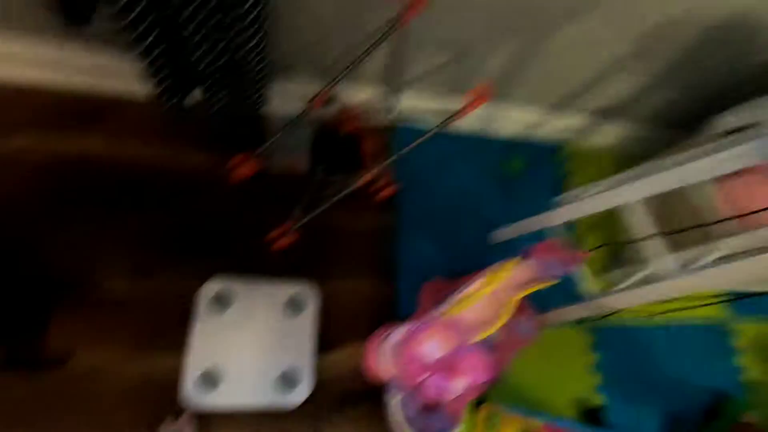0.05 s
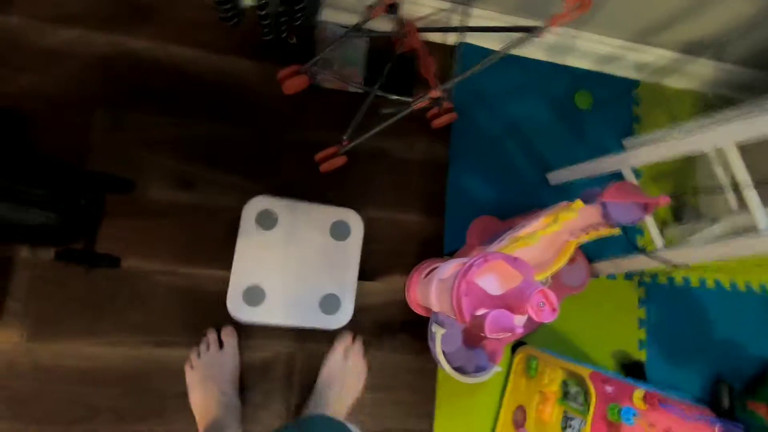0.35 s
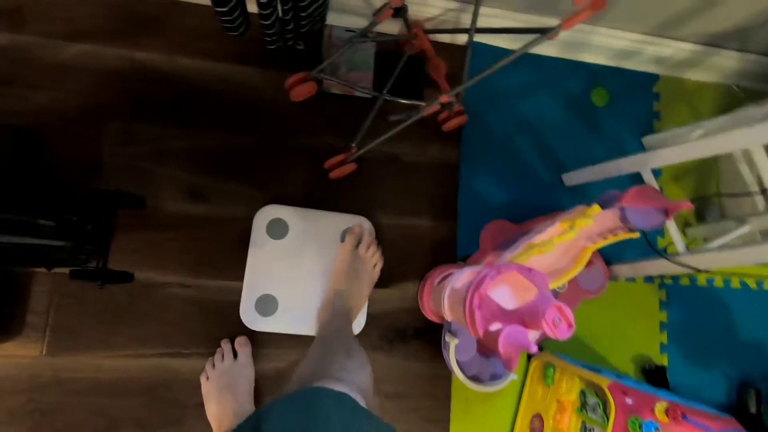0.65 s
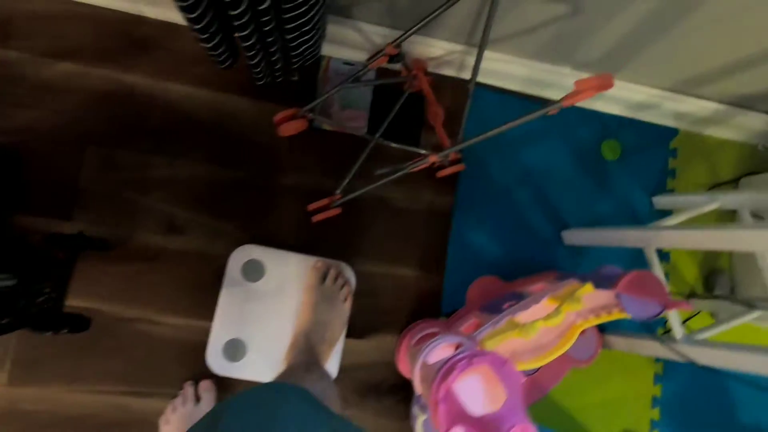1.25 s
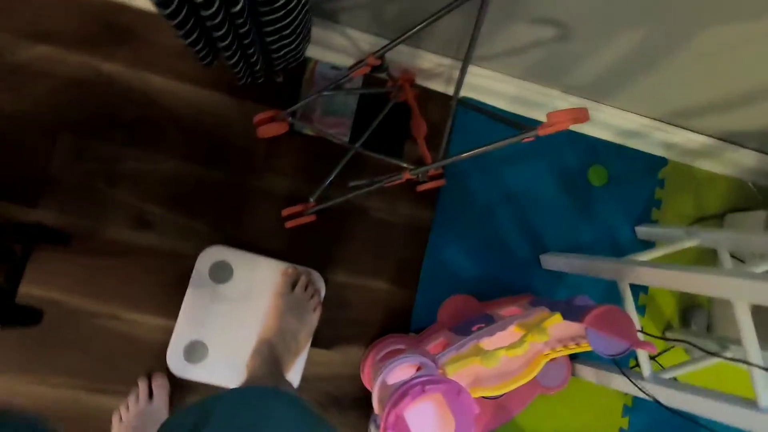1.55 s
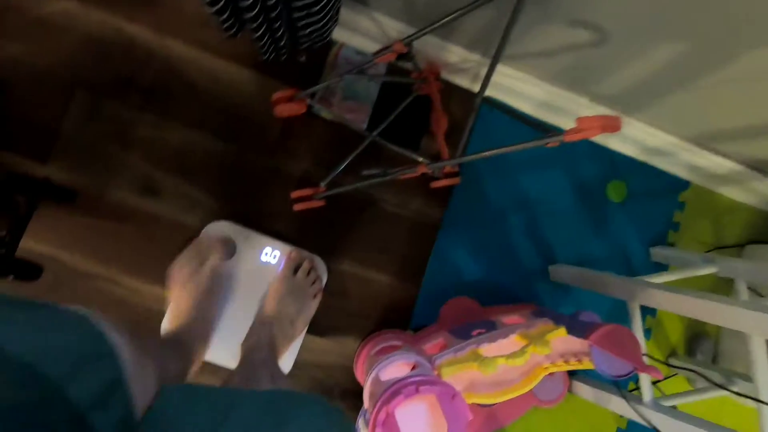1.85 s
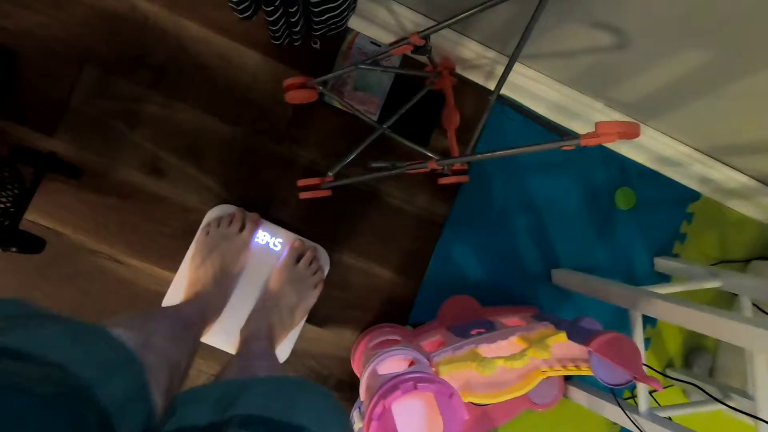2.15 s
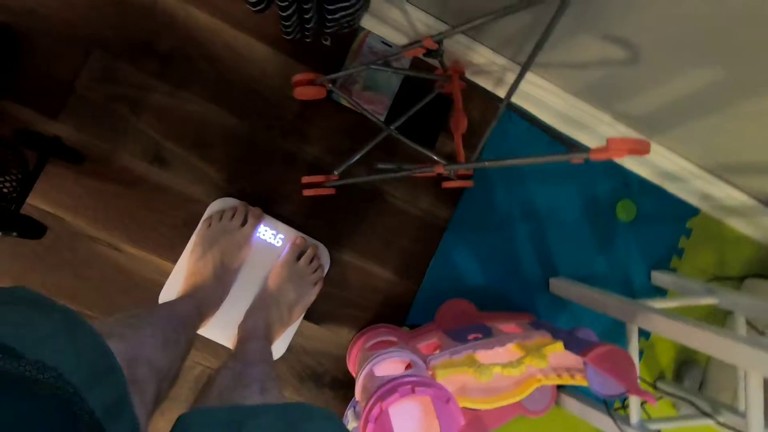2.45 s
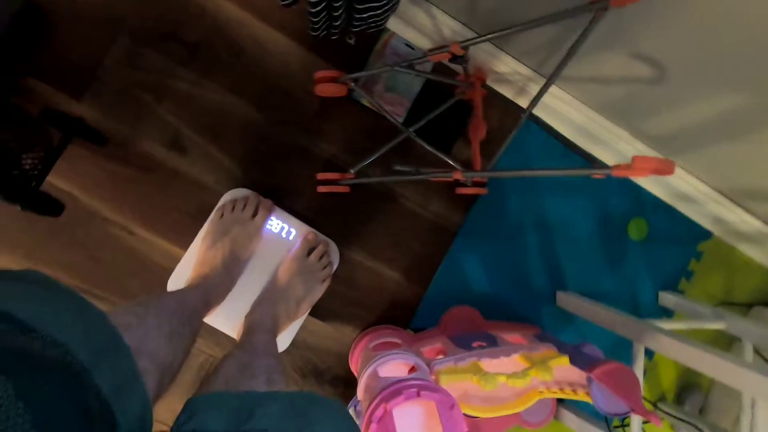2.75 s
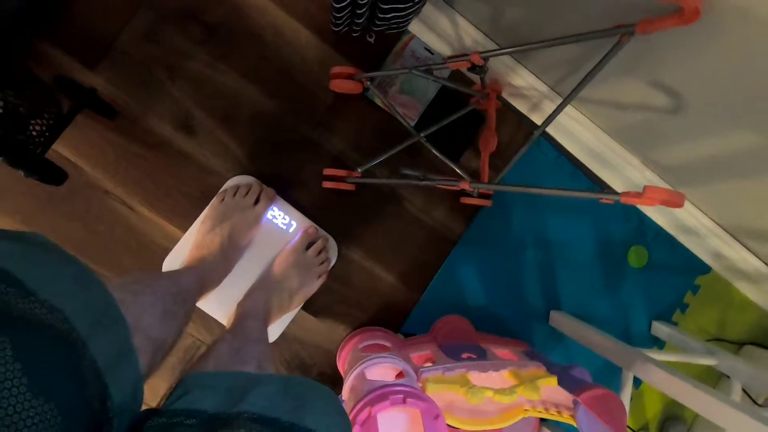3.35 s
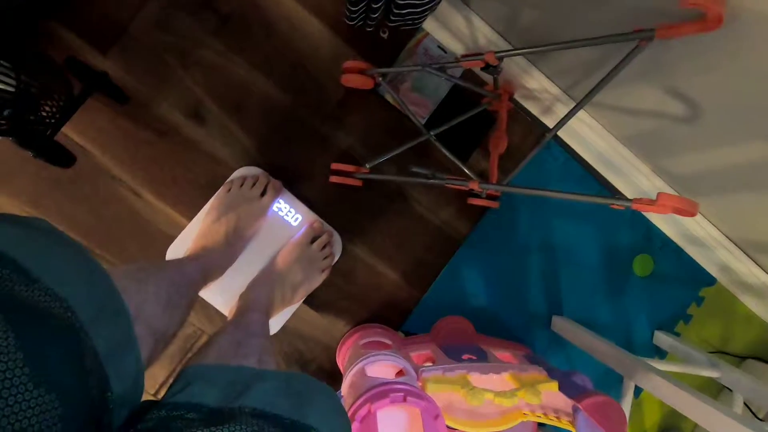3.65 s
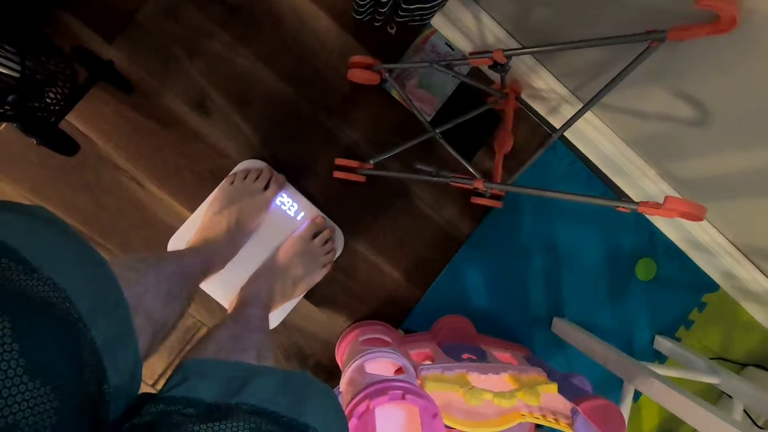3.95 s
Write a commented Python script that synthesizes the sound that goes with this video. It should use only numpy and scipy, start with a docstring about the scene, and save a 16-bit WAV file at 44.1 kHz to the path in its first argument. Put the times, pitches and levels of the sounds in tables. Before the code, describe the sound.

A bathroom scale clacks down on a wooden floor, then feet step softly onto it.

```python
"""A bathroom scale clacks down on a wooden floor: the impact excites damped modes of both.
A bare foot loads it with one knock and the second lands softly; scale and boards tick as the
weight shifts, and clothes rustle. Early on, a shifting grip bumps the hand-held camera.
The small quiet room reverberates briefly over a low rumble and a distant fan's drone.
Nearly all of the sound is in the left channel."""
import sys
import numpy as np
from scipy import signal
from scipy.fft import rfft, irfft, next_fast_len
from scipy.io import wavfile
from scipy.ndimage import map_coordinates

SR = 44100
rng = np.random.default_rng(int(sys.argv[2]) if len(sys.argv) > 2 else 0)


def waveform_to_disk(signal):
    """Save audio, clipped to [-1, 1], as 16-bit WAV at the path in sys.argv[1]."""
    frames = np.transpose(np.atleast_2d(signal))
    scaled = np.clip(frames, -1, 1) * 32767
    samples = np.round(scaled).astype(np.int16)
    wavfile.write(sys.argv[1], SR, samples)


N = 176400
T = np.arange(SR * 3 // 4) / SR  # time axis of one event, in seconds

# the scale's feet meet the floor: start_s, level_db, highpass_hz (all levels are relative)
CLACKS = [(0.0208, -16.5, 2250), (0.0244, -7, 300)]
# modes of the scale and of the floor: pitch_hz, level_db, t60_s
SCALE_MODES = [(1360, -17, 0.035), (1797, -7.5, 0.021), (1975, -7, 0.027), (2262, -1, 0.025),
               (2546, 1.5, 0.018), (2656, -6.5, .022), (3024, -8.5, 0.017), (4038, -2.5, 0.022),
               (4180, -5, .018), (6480, -12, .01)]
FLOOR_MODES = [(123, -10, 0.068), (154, -27, 0.093), (252, -45, 0.087), (496, -24, 0.043)]
# spectrum of the contact: frequency_hz, level_db
CLACK_SPECTRUM = [(300, -28.5), (900, -17.5), (1400, -9), (1800, -1), (2600, 5.5), (3300, -16), (4050, 2),
                  (4700, -6), (6800, -7), (8000, -11.5), (10800, -10), (11800, -27), (15500, -32.5)]


def scale_clack():
    """Impact excitation: one edge touches, then the scale lands, cracks and rings as the floor thuds."""
    out = np.zeros(N)
    for start_s, level_db, highpass_hz in CLACKS:
        body = amp(-7.5) * ring(SCALE_MODES, attack_s=0.00055)
        crack = amp(1) * contact(CLACK_SPECTRUM, grit_db=6, t60_s=0.016)
        highpass = signal.butter(2, highpass_hz, "highpass", fs=SR, output="sos")
        clack = in_room(signal.sosfilt(highpass, body + crack), wet_db=-12.5)
        thud = ring(FLOOR_MODES, attack_s=0.0043)
        add(out, start_s, amp(level_db) * (clack + thud))
    return out


# modes of the board (first foot) and the floor (second foot): pitch_hz, level_db, t60_s
BOARD_MODES = [(685, -7, 0.066), (738, 2, .03), (1740, -7, .025), (3640, -12, .015)]
TREAD_MODES = [(197, -1.5, 0.083), (394, 2, 0.062)]
# spectrum of the scale pressed onto the board: frequency_hz, level_db
KNOCK_SPECTRUM = [(250, -7.5), (480, -1.5), (750, 0.5), (1000, 0.5), (1300, -3), (1850, -0.5), (2600, -3.5),
                  (4500, -11), (9000, -21), (12000, -33.5), (15000, -38)]


def footsteps():
    """Sudden loading: one foot knocks the scale on the board; the softer second excites low modes."""
    out = np.zeros(N)
    board = amp(-3) * ring(BOARD_MODES, attack_s=0.00027)
    crack = amp(7) * contact(KNOCK_SPECTRUM, grit_db=8.5, t60_s=0.036)
    knock = amp(-29.5) * (board + in_room(crack, wet_db=-6.5))
    tread = amp(-45.5) * ring(TREAD_MODES, attack_s=0.0034)
    add(out, start_s=0.9475, sound=knock)
    add(out, start_s=1.7, sound=tread)
    return out


# a faint scuff just before the scale lands, then ticks as the weight shifts:
# start_s, level_db, centre_hz, width_octaves, t60_s
SCUFF_AND_TICKS = [(.002, -33.5, 1670, 0.96, 0.086), (1.245, -49.5, 760, 0.64, 0.055),
                   (1.2611, -43.5, 2600, 0.64, 0.033), (1.271, -56, 2980, 0.93, 0.023),
                   (1.6085, -52.5, 2580, 1.1, 0.022), (1.653, -48.5, 4140, 2.4, 0.024),
                   (2.0456, -42, 1150, 0.72, 0.03), (2.0476, -47, 1580, 1.24, 0.031),
                   (2.0465, -50.5, 7700, 0.26, .025), (2.8124, -56, 3000, 0.6, 0.015),
                   (2.8134, -52, 1040, 0.7, 0.017), (2.94, -56.5, 2100, 1.3, 0.24),
                   (3.004, -54, 2200, 0.9, 0.17)]


def scuff_and_ticks():
    """Stick-slip friction: each slip of scale and boards is a short burst in one broad resonance."""
    out = np.zeros(N)
    hz = np.geomspace(20, 20000, 60)
    lowpass = (1 + (hz / 10820) ** 10) ** -0.5  # the ticks fall away above about 11 kHz
    for start_s, level_db, centre_hz, width_octaves, t60_s in SCUFF_AND_TICKS:
        resonance = (1 + (np.log2(hz / centre_hz) / width_octaves) ** 2 / 2) ** -2
        spectrum = np.c_[hz, 20 * np.log10(resonance * lowpass)]
        slip = amp(9) * contact(spectrum, grit_db=7, t60_s=t60_s)
        add(out, start_s, amp(level_db) * in_room(slip, wet_db=-8.5))
    return out


# the hand bumps the camera: start_s, thump_db, click_db, click_t60_s
BUMPS = [(0.188, -40.5, -60, .018), (0.3244, -42.5, -46, 0.014), (0.381, -51.5, -48.5, 0.0099),
         (0.426, -52, -48.5, 0.02), (.433, -45.5, -50, 0.037), (0.496, -48.5, -58, 0.022)]
# modes of its case: pitch_hz, level_db, t60_s
CASE_MODES = [(120, 8.5, 0.079), (201, 8, 0.059), (571, -3, 0.083), (995, 0.5, 0.018)]
# rumble of its swing: time_s, level_db
SWAY_LEVEL = [(0, -24), (.2, -30.5), (.28, -40), (.36, -38), (.52, -28), (.75, -44.5), (1.0, -47), (4, -56)]
# spectra of the swing and of a click: frequency_hz, level_db
SWAY_SPECTRUM = [(3, -11), (12, 16), (20, -19.5), (45, -14), (90, -26.5), (200, -57), (600, -100)]
CLICK_SPECTRUM = [(500, 6.5), (1100, 4.5), (2500, 1.5), (4000, -9.5), (9000, -12.5), (14000, -36)]


def camera_handling():
    """Structure-borne sound: the case clicks and thumps, a little differently per grip, over a rumble."""
    out = amp(curve(SWAY_LEVEL)) * noise(SWAY_SPECTRUM, size=N)
    for start_s, thump_db, click_db, click_t60_s in BUMPS:
        click = noise(CLICK_SPECTRUM, size=len(T)) * fade(click_t60_s)
        gripped_modes = [(hz * (1 + rng.normal(0, 0.025)), db + rng.normal(0, 1.5), t60_s)
                         for hz, db, t60_s in CASE_MODES]
        thump = ring(gripped_modes, attack_s=0.0047)
        add(out, start_s, amp(thump_db) * thump + amp(click_db) * click)
    return out


# rustle of the moving legs: time_s, level_db
RUSTLE_LEVEL = [(0, -62), (.35, -72), (.52, -67.5), (.65, -75), (.85, -74.5), (1.17, -66), (1.3, -69),
                (1.5, -74.5), (1.58, -67.5), (1.7, -62), (1.8, -71.5), (1.92, -69), (2.2, -67.5),
                (2.55, -74.5), (2.83, -70.5), (3.0, -77.5), (3.12, -83.5), (3.25, -76.5), (3.45, -100.5),
                (4, -82)]
# spectrum of brushing fabric: frequency_hz, level_db
CLOTH_SPECTRUM = [(300, -13), (1000, 2.5), (2500, -1.5), (4500, -2), (6500, -3), (8000, -4), (9500, -8),
                  (12000, -15), (15500, -18)]


def clothes():
    """Friction noise: fabric brushes as the legs move and settles once the person stands still."""
    flutter_db = 0.9 * (wobble(rate_hz=14) + wobble(rate_hz=140))
    return amp(curve(RUSTLE_LEVEL) + flutter_db) * noise(CLOTH_SPECTRUM, size=N)


# spectra of the room's noise and of the fan: frequency_hz, level_db
ROOM_TONE_SPECTRUM = [(12, -8.5), (25, 4), (45, -0.5), (90, -5.5), (125, -14.5), (210, -19.5), (280, -31.5),
                      (570, -30.5), (750, -35), (1300, -39.5), (1750, -42), (2500, -45), (4000, -49),
                      (15000, -60)]
FAN_SPECTRUM = [(100, -23.5), (135, -0.5), (210, 1), (275, -7), (325, 2.5), (385, -2.5), (485, 1),
                (560, -14.5), (750, -21), (1700, -28.5), (2080, -19), (2500, -28.5), (5000, -44)]
# the fan grows as the camera turns: time_s, level_db
FAN_LEVEL = [(0, -65), (.8, -66), (1.15, -61), (1.8, -63), (2.5, -61), (4, -59.5)]


def room_tone_and_fan():
    """Ambient noise: steady rumble and hiss, with the broad spectral peaks of a distant fan."""
    room_tone = amp(-47) * noise(ROOM_TONE_SPECTRUM, size=N)
    fan = amp(curve(FAN_LEVEL)) * noise(FAN_SPECTRUM, size=N)
    return room_tone + fan


# reverberation time: frequency_hz, t60_s
ROOM_T60 = [(150, 0.13), (600, 0.41), (2000, 0.47), (5000, 0.41), (9000, 0.3), (14000, 0.26)]
# spectrum of the reverberant tail: frequency_hz, level_db
TAIL_SPECTRUM = [(100, -10), (500, 6), (1800, 0), (3000, -8), (9000, -1), (14000, 0)]


def in_room(dry, wet_db):
    """Reverberation: direct sound, early scatter off nearby things, then a diffuse tail."""
    early_rise_s, tail_rise_s = 0.0023, 0.013
    hz, t, bands = signal.stft(rng.standard_normal(len(T)), SR, nperseg=256)
    bands = bands * fade(along(ROOM_T60, hz)[:, None], t) * amp(along(TAIL_SPECTRUM, hz))[:, None]
    tail = signal.istft(bands, SR, nperseg=256)[1][:len(T)] * (1 - np.exp(-(T / tail_rise_s) ** 2))
    early = rng.standard_normal(len(T)) * fade(t60_s=0.058) * (1 - np.exp(-(T / early_rise_s) ** 2))
    response = amp(wet_db) * tail / np.linalg.norm(tail) + amp(-6.5) * early / np.linalg.norm(early)
    return dry + signal.fftconvolve(dry, response)[:len(dry)]


def contact(spectrum, grit_db, t60_s):
    """Impulsive contact: a minimum-phase pulse and a decaying burst of grit share one spectrum."""
    size = len(T)
    hz = np.fft.rfftfreq(size, 1 / SR)
    cepstrum = irfft(np.log(amp(along(spectrum, hz))), size)
    causal = np.r_[1, np.full(size // 2, 2), np.zeros(size - size // 2 - 1)]
    pulse = irfft(np.exp(rfft(cepstrum * causal)), size)
    grit = noise(spectrum, size) * fade(t60_s)
    return pulse / np.linalg.norm(pulse) + amp(grit_db) * grit / np.linalg.norm(grit)


def ring(modes, attack_s):
    """Free vibration: a sum of damped modes set off by one contact."""
    vibration = sum(amp(db) * fade(t60_s) * np.sin(2 * np.pi * hz * T) for hz, db, t60_s in modes)
    return vibration * (1 - np.exp(-T / attack_s))


def fade(t60_s, t=T):
    """Exponential decay, 60 dB in t60_s."""
    return np.exp(-np.log(1000) * t / t60_s)


def noise(spectrum, size):
    """Spectrally shaped noise of rms 1."""
    shaped = filtered(rng.standard_normal(size), lambda hz: amp(along(spectrum, hz)))
    return shaped / np.sqrt(np.mean(shaped ** 2) + 1e-20)


def filtered(sound, gain):
    """Linear filtering by a gain that depends on frequency."""
    size = sound.shape[-1]
    padded = next_fast_len(size + 8192)
    return irfft(rfft(sound, padded) * gain(np.fft.rfftfreq(padded, 1 / SR)), padded)[..., :size]


def wobble(rate_hz):
    """Smooth random modulation, rate_hz knots a second."""
    return map_coordinates(rng.standard_normal(2048), [np.arange(N) * rate_hz / SR], mode="wrap")


def along(points, hz):
    """Interpolation of (frequency_hz, value) points on a log axis."""
    knots_hz, values = np.transpose(points)
    return np.interp(np.log(hz + 1), np.log(knots_hz + 1), values)


def curve(points):
    """Interpolation of (time_s, value) points at every sample."""
    return np.interp(np.arange(N) / SR, *np.transpose(points))


def amp(db):
    """Decibels to gain."""
    return 10 ** (np.asarray(db) / 20)


def add(track, start_s, sound):
    """Superpose a sound on the track."""
    part = track[round(start_s * SR):][:len(sound)]
    part += sound[:len(part)]


# spectrum of the right channel's hiss: frequency_hz, level_db
HISS_SPECTRUM = [(50, -2.5), (400, -7.5), (2000, -11), (15000, -13)]


def scene():
    """Superposition at one microphone on the left; the right holds only a trace and faint hiss."""
    left = 2 * (scale_clack() + footsteps() + scuff_and_ticks() + camera_handling() + clothes()
                + room_tone_and_fan())
    right = amp(-59.5) * left + amp(-84) * noise(HISS_SPECTRUM, size=N)
    return np.array([left, right])


def record(dry):
    """Band limiting: nothing passes above the cutoff."""
    cutoff_hz = 15480
    return filtered(dry, lambda hz: hz < cutoff_hz)


dry = scene()
out = record(dry)
waveform_to_disk(out)
```